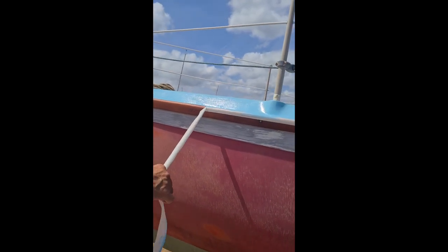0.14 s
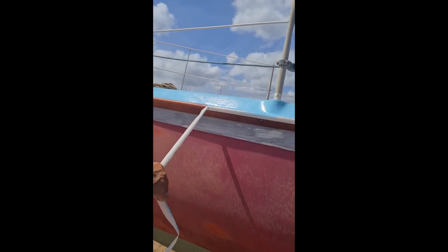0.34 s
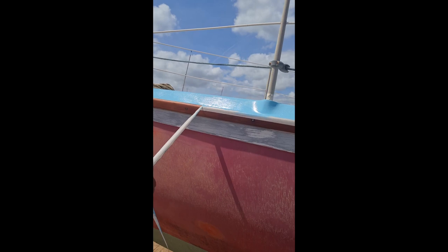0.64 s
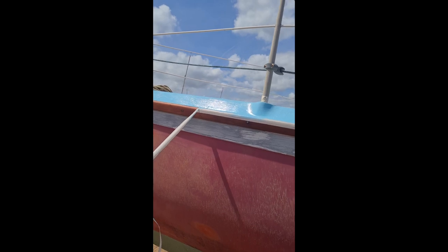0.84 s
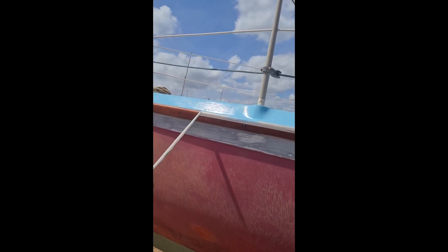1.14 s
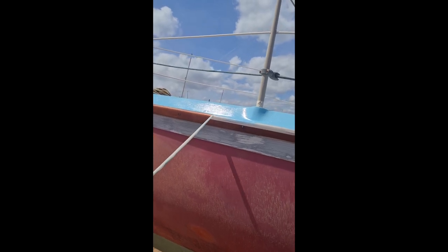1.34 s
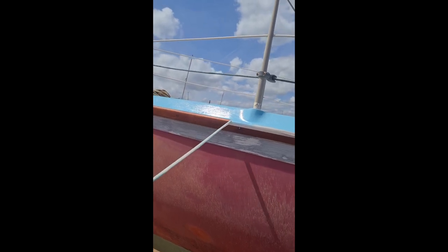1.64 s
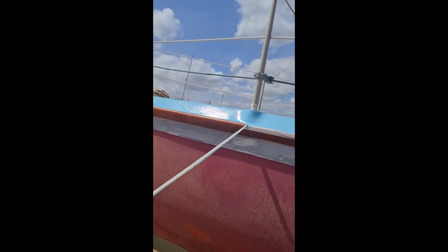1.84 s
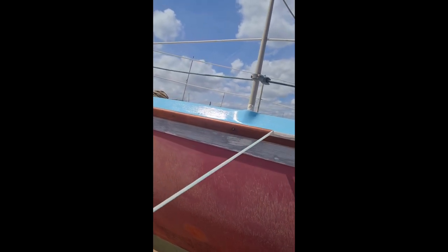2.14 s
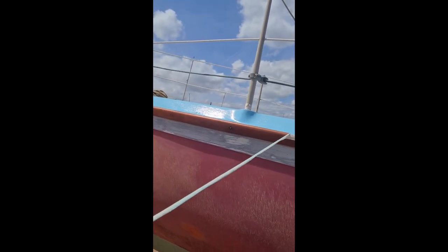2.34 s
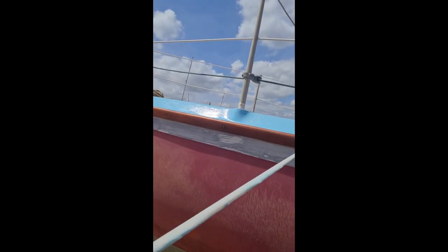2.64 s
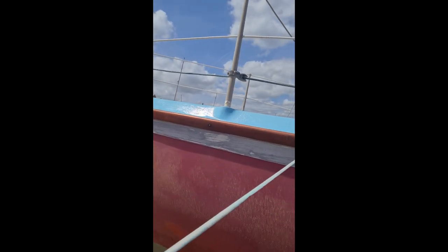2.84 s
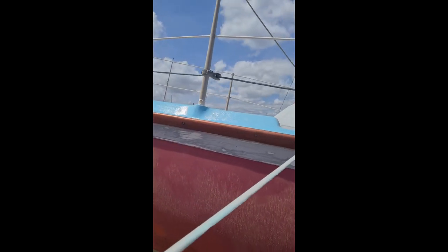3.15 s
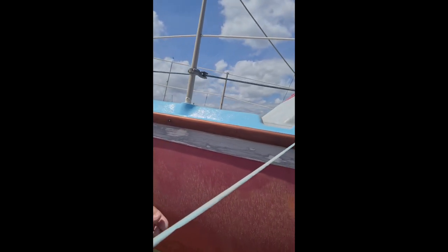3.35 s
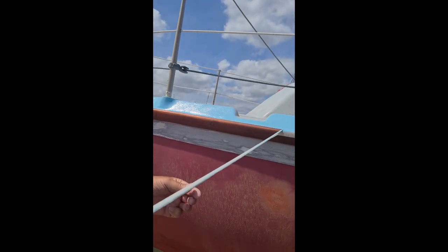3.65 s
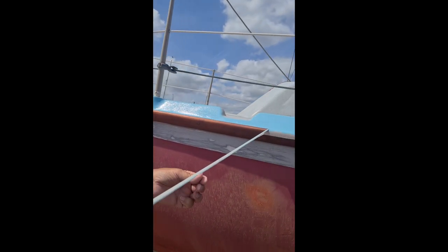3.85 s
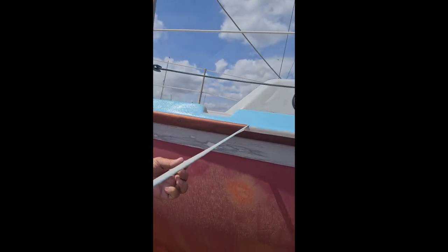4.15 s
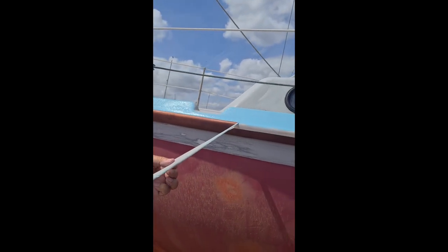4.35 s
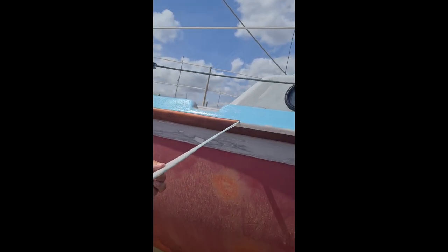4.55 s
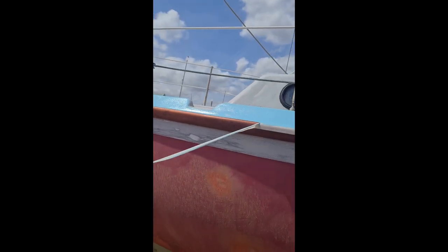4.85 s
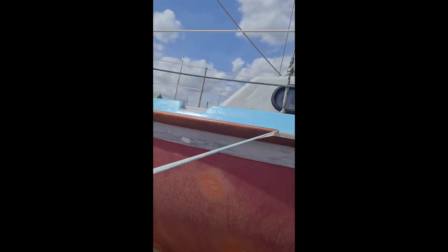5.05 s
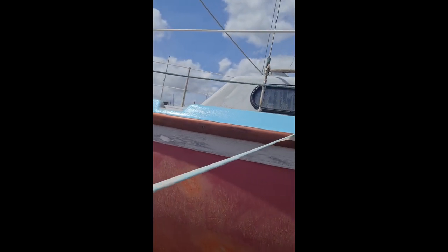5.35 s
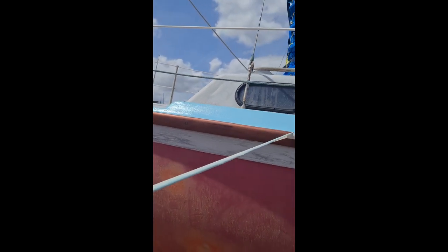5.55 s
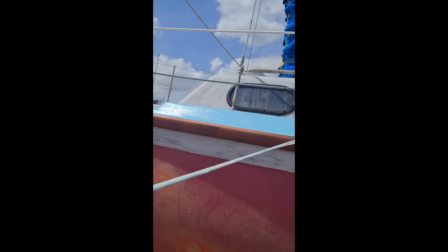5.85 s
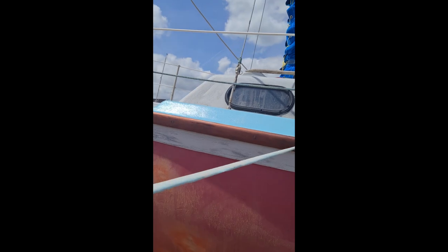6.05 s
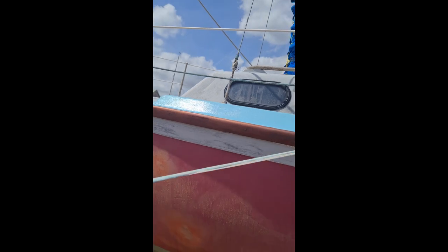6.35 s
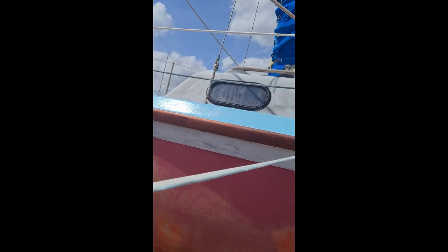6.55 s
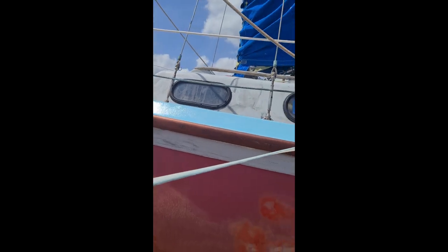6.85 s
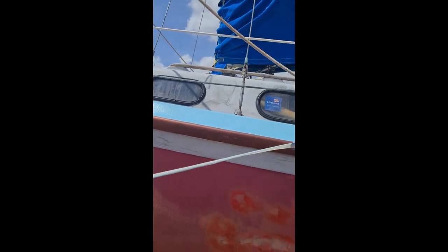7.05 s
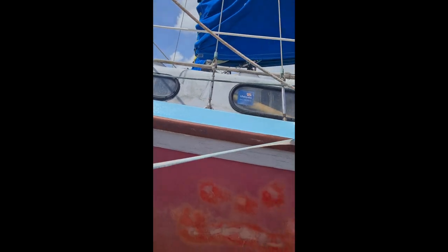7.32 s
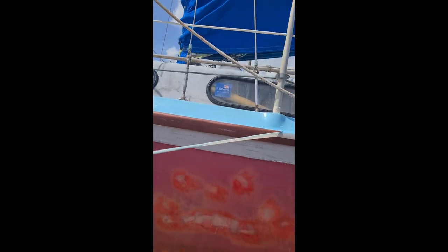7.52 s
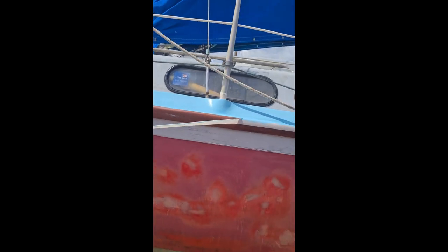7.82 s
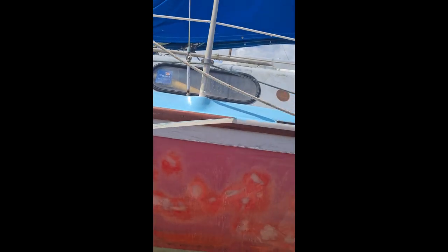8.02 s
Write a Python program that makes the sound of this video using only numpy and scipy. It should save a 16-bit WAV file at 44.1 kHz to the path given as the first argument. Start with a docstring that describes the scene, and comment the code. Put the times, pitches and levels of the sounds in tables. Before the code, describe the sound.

Close stereo phone pickup with separate wind buffets on each side. A big low thump comes just before one second, then tape tears away in fine bright snaps. The pull weakens, gritty shoe scuffs crunch mid-way, and the peel resumes stronger, catching and letting go several times a second. Later gusts flutter harder, and a faint metallic clink sounds near the end. Dry open air, no echo.

```python
"""Wind buffets two microphone ports separately while a shoe scuffs gritty ground and a metal fitting clinks.
Masking tape is then pulled off a painted hull in a breezy yard: the glue lets go in a spray of tiny snaps.
Wind is summed pressure bumps; tape and grit are random impulses through filters; the fitting is ringing modes.
The left port faces the tape; the right hears it dull, by a late direct path and stray ones around the phone."""
import sys
import numpy as np
from scipy import signal
from scipy.fft import rfft, irfft
from scipy.io import wavfile

SR = 44100
rng = np.random.default_rng(int(sys.argv[2]) if len(sys.argv) > 2 else 0)


def store_pcm(level_fs):
    """Save levels as 16-bit WAV."""
    pcm = np.round(np.clip(level_fs, -1, 1) * 32767).astype(np.int16)
    wavfile.write(sys.argv[1], SR, np.atleast_2d(pcm).T)


N = 360738   # length in samples

# The pull. Each row: time in seconds, snapping in dB before the near-port gain and the dips,
# drumming of the taut strip in dB relative to the snapping.
PULL_CURVE = [(0.0, -109, 3), (0.89, -78.5, -16), (1.05, -56.5, -18), (1.16, -49, -5.5), (1.87, -49, -6),
              (2.3, -49, -13.5), (2.62, -49, -4.5), (2.82, -58, -7), (3.1, -53.5, -22), (3.44, -77, 10.5),
              (3.6, -54, 0.5), (4.12, -74.5, -17), (4.24, -66.5, 10), (4.35, -75, 4), (4.55, -51.5, -5.5),
              (5.0, -43.5, -24), (5.35, -42.5, -11.5), (5.6, -49.5, -10.5), (5.92, -45, -14.5),
              (6.42, -45, -17), (6.75, -51.5, -13), (7.18, -43, -26), (7.6, -45, -17), (7.8, -42.5, -28),
              (8.18, -44.5, -17)]
# The tape catches and the pull falters. Each row: centre in seconds, dip in dB, half length in seconds.
PULL_STALLS = [(5.082, 4.5, 0.062), (5.258, 7.5, .08), (5.451, 18, 0.091), (5.673, 5.5, 0.06),
               (5.828, 14.5, 0.093), (6.02, 6, 0.039), (6.178, 12, 0.082), (6.312, 5, .07),
               (6.56, 7.5, .14), (6.766, 10, 0.043), (6.955, 6, 0.047), (7.121, 8.5, 0.054),
               (7.327, 6, 0.064), (7.5, 11, 0.094), (7.685, 19.5, 0.11), (7.887, 8.5, 0.075),
               (8.06, 8, 0.068)]
# Spectrum of the glue letting go. Each row: frequency in Hz, relative density in dB per Hz.
SNAP_SPECTRUM = [(2940, -21), (5000, -14.5), (6360, -9.5), (6820, -5), (7630, -4.5), (8100, -3.5),
                 (8420, -5), (9020, -17), (9480, -16), (11000, -11.5), (15000, -7), (15800, -13),
                 (16200, -42.5)]
# Spectrum of the drumming strip. Each row: frequency in Hz, relative density in dB per Hz.
STRIP_SPECTRUM = [(1500, -16.5), (2200, -15), (3000, 0), (4000, 3.5), (5200, 1), (6500, 2), (8500, -35)]
# Single loud snaps. Each row: start in seconds, peak of the high part in dB before the near-port gain,
# peak of the low part in dB relative to the high.
LOUD_SNAPS = [(0.078, -71, 19), (0.5805, -65, -10), (0.6135, -52, -5), (0.624, -44, -15),
              (0.856, -47.5, 2.5), (0.951, -53, -23), (1.0824, -39, -15), (1.1612, -34, -7),
              (1.263, -34, -16), (1.396, -30, -20), (1.5703, -45, -21), (1.8198, -37, -13),
              (1.854, -32.5, -23), (1.8955, -30, -32), (3.321, -66, 19), (3.5808, -43.5, 17),
              (4.067, -76, 9), (4.282, -51, -12), (4.3427, -56, 24.5), (5.7609, -43.5, 20), (5.758, -58, 6),
              (5.774, -38, 4), (5.8897, -46, -22), (6.0516, -38, -22), (6.4967, -44, 12), (6.722, -47, -14),
              (7.029, -30, -16), (7.171, -31.5, -31), (7.524, -48.5, 14), (7.7837, -40, -25)]
# Loss on the way to the right port. Each row: frequency in Hz, loss in dB.
BODY_SHADOW = [(300, -7.5), (700, 9), (1400, 15), (3000, 27), (4500, 25.5), (7500, 42), (8500, 37),
               (9500, 21), (12000, 13), (13500, 21), (15000, 22)]
# Shoes dragging on grit. Each row: start in seconds, held time in seconds, level in dB,
# sharpness in dB per octave.
SHOE_DRAGS = [(0.04, 0.036, -43, -15), (1.16, .38, -44.5, -1), (2.59, 0.052, -35.5, 2.5),
              (2.77, 0.055, -35, -6), (3.17, 0.085, -35.5, -1), (3.32, 0.026, -41, 3.5),
              (3.49, 0.051, -33.5, 1), (3.54, 0.24, -29.5, 1), (3.755, 0.02, -29, -0.5),
              (3.82, 0.15, -37.5, -0.5), (4.22, 0.038, -30.5, -6), (4.345, 0.0088, -37.5, 1.5),
              (4.44, .04, -43, 3.5), (4.5, 0.045, -29.5, 2), (4.6, 0.07, -37.5, 2.5),
              (4.669, 0.091, -29, 1.5), (4.78, 0.038, -34, 2), (5.14, 0.023, -36, 2.5),
              (5.33, 0.23, -35, -5), (5.51, 0.011, -38, 6), (5.76, 0.01, -42, 7), (6.16, .16, -40, 0),
              (6.21, .06, -35, 1), (6.42, .06, -38.5, -5), (6.495, 0.028, -20.5, 0), (6.58, .3, -39, -6.5),
              (7.0, 0.037, -31.5, -36), (7.28, 0.032, -40, 4.5), (7.47, 0.061, -34.5, -9.5),
              (7.6, 0.097, -43.5, -1), (8.0, 0.035, -40, -8), (8.05, .06, -25, -21)]
# Grit shifting between the drags. Each row: time in seconds, level in dB.
GRIT_SHUFFLE = [(1.0, -83), (1.2, -59), (2.5, -46), (3.0, -54), (4.2, -55.5), (5.0, -44.5), (5.9, -52),
                (6.9, -49), (7.2, -57), (8.18, -72)]
# Resonances of sole and grit. Each row: frequency in Hz, width in Hz before a common 40 Hz is added,
# relative level in dB before sharpness and drift.
GRIT_MODES = [(690, 100, -2.5), (1063, 115, 4), (1370, 217, 0.5), (1940, 280, -2.5), (2196, 27, -1.5),
              (2450, 460, -6), (3230, 340, -13), (3695, 9.1, -5.5)]
# Knocks on the metal fitting. Each row: time in seconds, strength in dB.
FITTING_KNOCKS = [(0.199, -64), (6.747, -38)]
# Modes of the fitting. Each row: frequency in Hz, relative level in dB, 60 dB decay time in seconds.
FITTING_MODES = [(2050, -15, .1), (3420, -4.5, 0.23), (3350, -19, 0.23), (4030, -7.5, 0.19),
                 (6300, -2, 0.12)]
# Eddy sizes. Each row: top frequency in Hz, eddies per second, relative level in dB,
# share of the small-eddy control followed.
EDDY_SIZES = [(77.9, 300, -1, 0.019), (163, 300, -6.5, 0.22), (275, 380, -4, 0.64), (415, 250, -8.5, 1.08),
              (702, 280, -15.5, 2.1), (1140, 700, -26.5, 3.5), (2210, 490, -50, 3)]
# Wind on the left port. Each row: time in seconds, big-eddy control in dB, small-eddy control in dB
# relative to it.
LEFT_GUSTS = [(0.0, -32, -61), (0.15, -30, -15), (0.32, -26, -16), (0.47, -44, -20), (0.65, -31, -5),
              (0.87, -16.5, -14), (1.02, -24, -22), (1.1, -26.5, -45), (1.4, -33, -22), (1.7, -28, -39),
              (2.15, -41.5, -38), (2.7, -35, -25), (2.85, -33.5, -22), (3.15, -35, -31), (3.3, -63, -13),
              (3.95, -47, -27), (4.08, -31, -39), (4.2, -71, -14), (4.5, -31.5, -46), (4.85, -26.5, -21),
              (5.2, -32.5, -24.5), (5.5, -29, -15.5), (5.7, -30.5, -1.5), (5.9, -32, -1.5),
              (6.0, -23.5, -16.5), (6.28, -25.5, -16), (6.5, -30.5, 2), (6.9, -30.5, -1.5),
              (7.15, -22.5, -15.5), (7.35, -34, -12.5), (7.5, -34, -0.5), (8.05, -26, -18),
              (8.18, -33, -12)]
# Wind on the right port. Each row: time in seconds, big-eddy control in dB, small-eddy control in dB
# relative to it.
RIGHT_GUSTS = [(0.0, -50, -22), (0.55, -44.5, -22), (0.78, -32.5, -24), (0.92, -40, -23.5),
               (1.42, -44, -30), (1.62, -33, -10), (1.82, -42.5, -24), (2.0, -26, -13), (2.9, -30, -15),
               (3.18, -51, -18), (3.55, -54, -13), (4.2, -62, -15), (4.55, -41, -33), (4.95, -31, -14.5),
               (5.17, -30, -12.5), (5.3, -43, -34), (5.48, -25, -12.5), (5.78, -27.5, -2), (5.9, -46, -36),
               (6.17, -39, -28), (6.3, -24, -3.5), (6.55, -32.5, 0), (6.9, -31, 0), (7.15, -32, -8.5),
               (7.48, -23, -4.5), (7.65, -32.5, 3.5), (7.95, -28, -8), (8.18, -28, 0)]
# Strongest single eddies. Each row: centre in seconds, peak in dB, pitch in Hz, port (0 left, 1 right).
SINGLE_EDDIES = [(0.303, -10.5, 79.5, 0), (0.743, -16, 264, 0), (0.847, -17, 243, 0), (0.89, -3.5, 72, 0),
                 (0.903, -10.5, 250, 0), (0.991, -13, 201, 0), (1.719, -13.5, 69, 0), (4.069, -30, 69.5, 0),
                 (5.709, -17, 430, 0), (5.742, -16, 380, 0), (5.842, -15.5, 298, 0), (5.892, -12, 282, 0),
                 (6.01, -6, 78.4, 0), (6.338, -18, 75.0, 1), (6.42, -14, 242, 1), (6.441, -18.0, 220.0, 1),
                 (6.499, -15.5, 530.0, 0), (6.523, -13, 320.0, 0), (6.529, -14, 296, 1),
                 (6.542, -12, 310.0, 1), (6.633, -17, 378, 0), (6.685, -14.5, 280, 1),
                 (6.797, -16, 270.0, 0), (6.832, -16, 330, 1), (6.853, -16, 290.0, 0),
                 (6.887, -17, 280.0, 1), (7.379, -17.5, 270.0, 1), (7.479, -14.5, 315, 1),
                 (7.502, -15, 252, 1)]
# Far yard noise. Each row: frequency in Hz, left density in dB per Hz, right density in dB per Hz.
YARD_SPECTRA = [(29, -94, -68), (63.5, -60.5, -66), (105, -86, -83), (285, -88, -93.5), (547, -88.5, -100),
                (930, -94.5, -108), (1780, -104, -118), (4300, -109, -126), (5700, -116, -130),
                (7400, -103, -136), (7970, -107, -134), (8800, -130, -131), (12500, -123, -122),
                (15500, -127, -125)]

NEAR_PORT_DB = 2   # gain of tape sounds, as the left port faces the tape
DRUM_KEEPS = 0.31   # share of each dip that the still taut strip does not follow
LATE_SAMPLES = 19   # longer direct way to the right port
SCATTER = 0.75   # share of the right port's power that comes by stray paths
SCUFF_RISE_DB_PER_S, SCUFF_FALL_DB_PER_S = 380, 380
SHUFFLE_SHARPNESS_DB = 6   # per octave
PORT_CUT_HZ, CUTOFF_HZ = 74.4, 15800   # wind pressure leak, recording top


def from_db(db):
    """The decibel law: level to amplitude gain."""
    return 10 ** (np.asarray(db) / 20)


def rms_one(x):
    """Normalisation by power: scale to rms 1."""
    return x / np.sqrt(np.mean(x ** 2) + 1e-20)


def in_time(rows):
    """Linear interpolation: columns of a curve table, one value a sample."""
    seconds, *columns = np.transpose(rows)
    t = np.arange(N) / SR
    return [np.interp(t, seconds, column) for column in columns]


def response(points, column=1):
    """Frequency response: a table in Hz and dB as gain on the FFT grid, linear in log frequency."""
    hz = np.maximum(np.fft.rfftfreq(N, 1 / SR), 1)
    table = np.array(points)
    return from_db(np.interp(np.log(hz), np.log(table[:, 0]), table[:, column]))


def colour(x, gain):
    """Linear filtering as a product of spectra on the FFT grid."""
    return irfft(rfft(x) * gain, N)


def drift(rate_hz):
    """Low-passed noise: a slow random course with rms 1."""
    r = np.exp(-40 * np.pi * rate_hz / SR)   # computed at a twentieth of SR
    noise = rng.standard_normal(N // 20 + 2002)
    slow = signal.lfilter([1], [1, -2 * r, r * r], noise)[2000:]   # start-up discarded
    return np.interp(np.arange(N) / 20, np.arange(len(slow)), rms_one(slow))


def grains(per_s, spread_db, upward=.5):
    """Shot noise: random impulses of uneven size; upward is the share that pushes rather than pulls."""
    sizes = from_db(spread_db * np.minimum(rng.exponential(1, N), 5))
    signs = np.where(rng.random(N) < upward, 1., -1.)
    happens = rng.random(N) < per_s / SR
    return sizes * signs * happens + 1e-18


def band(x, low_hz, high_hz, order=2):
    """Butterworth band-pass: maximally flat between two edges."""
    sos = signal.butter(order, [low_hz, high_hz], "band", fs=SR, output="sos")
    return signal.sosfilt(sos, x)


def peel():
    """Stick-slip fracture: glue threads snap densely; coarser jerks also drum on the stretched strip."""
    snap_db, strip_db = in_time(PULL_CURVE)
    dip_db = stalls()
    jerks = grains(200, spread_db=2.7, upward=1)
    jerk_envelope = signal.lfilter([1], [1, -np.exp(-1 / (0.0017 * SR))], jerks)   # 1.7 ms decay
    jerks = rms_one(jerk_envelope * rng.standard_normal(N))
    threads = rms_one(grains(6000, spread_db=0.0) * from_db(1.16 * drift(30)))
    snapping = rms_one(colour(threads + .5 * jerks, response(SNAP_SPECTRUM)))
    drumming = rms_one(colour(threads + 1.1 * jerks, response(STRIP_SPECTRUM)))
    drumming = drumming * from_db(strip_db + DRUM_KEEPS * dip_db)
    twisting = patchy(snapping + drumming, depth_db=2.0)
    return from_db(snap_db - dip_db + NEAR_PORT_DB) * twisting


def stalls():
    """Slackening tension: the pull dips in dB toward each catch and picks up again after it."""
    t = np.arange(N) / SR
    return sum(dip_db * np.maximum(1 - abs(t - s) / half_s, 0) for s, dip_db, half_s in PULL_STALLS)


def patchy(x, depth_db):
    """Varying radiation: the strip twists as it comes away, so each band swells and sinks by itself."""
    edges_hz = np.geomspace(2000, 16000, 19)
    out = x
    for low_hz, high_hz in zip(edges_hz, edges_hz[1:]):
        change = from_db(depth_db * drift(7.6)) - 1
        out = out + band(x, low_hz, high_hz, order=1) * change
    return out


def ticks():
    """Sudden release at a stubborn spot: a sharp crack with a ragged tail of a few milliseconds."""
    out, age = np.zeros(N), np.arange(700) / SR
    for s, peak_db, low_db in LOUD_SNAPS:
        burst = .4 * rng.standard_normal(700) * np.exp(-age / .002)
        burst[0] = 1
        high = band(burst, 3500, 8600)
        low = band(burst, 1000, 4000, order=1)
        crack = high / abs(high).max() + from_db(low_db) * low / abs(low).max()
        at = round(s * SR)
        out[at:at + 700] += from_db(peak_db) * crack
    return from_db(NEAR_PORT_DB) * out


def scuff():
    """Granular friction: grit cracks under the sole in uneven bursts; sharp drags favour outer resonances."""
    level, sharpness_db = drags()
    grit = rms_one(grains(2500, spread_db=0.0) * from_db(4.3 * np.tanh(drift(19) / 1.24)))
    out = from_db(-16.5 + 1.7 * sharpness_db) * band(grit, 1700, 5900, order=1)   # dry rasp
    for k, (hz, width_hz, mode_db) in enumerate(GRIT_MODES):
        r = np.exp(-np.pi * (width_hz + 40) / SR)
        poles = [1, -2 * r * np.cos(2 * np.pi * hz / SR), r * r]
        ring = signal.lfilter([1, 0, -1], poles, grit) * (1 - r * r) / 2
        octaves = abs(np.log2(hz / 1150))   # distance to either side of 1150 Hz
        gain_db = mode_db + sharpness_db * octaves + 2.03 * drift(26)
        out = out + ring * from_db(gain_db) * (-1) ** k   # alternating polarity
    return level * out


def drags():
    """Addition of powers: drags rise, hold and die over the shuffle; the loudest sets the sharpness."""
    t = np.arange(N) / SR
    power = from_db(2 * in_time(GRIT_SHUFFLE)[0])   # twice the dB turns gain into power
    weighted = power * SHUFFLE_SHARPNESS_DB
    for s, held_s, level_db, sharpness_db in SHOE_DRAGS:
        before_db = SCUFF_RISE_DB_PER_S * np.maximum(s - t, 0)
        after_db = SCUFF_FALL_DB_PER_S * np.maximum(t - s - held_s, 0)
        drag = from_db(2 * (level_db - before_db - after_db))
        power = power + drag
        weighted = weighted + drag * sharpness_db
    return np.sqrt(power), weighted / power


def clinks():
    """Modal vibration: each knock sets the damped modes of the fitting ringing."""
    knocks, out = np.full(N, 1e-18), 0
    for s, strength_db in FITTING_KNOCKS:
        knocks[round(s * SR)] = from_db(strength_db)
    for hz, level_db, t60_s in FITTING_MODES:
        r, w = from_db(-60 / (t60_s * SR)), 2 * np.pi * hz / SR
        ring = signal.lfilter([0, np.sin(w)], [1, -2 * r * np.cos(w), r * r], knocks)
        out = out + from_db(level_db) * ring
    return out


def shaded(x):
    """Diffraction and scattering: a late direct path plus stray paths that shift, dulled by the phone's body."""
    direct = np.pad(x, (LATE_SAMPLES, 0))[:N]
    paths = rng.standard_normal((2, 2000)) * np.exp(-np.arange(2000) / (0.017 * SR))
    first, second = (signal.fftconvolve(x, path / np.linalg.norm(path))[:N] for path in paths)
    sway = 2.5 * drift(12)   # radians; the phone sways
    stray = np.cos(sway) * first + np.sin(sway) * second
    heard = np.sqrt(1 - SCATTER) * direct + np.sqrt(SCATTER) * stray
    heard[-300:] *= np.linspace(1, 0, 300)   # nothing wraps round to the start
    return colour(heard, 1 / response(BODY_SHADOW))


def wind(big_db, small_db):
    """Turbulent pressure: eddies pass as smooth bumps; a faster gust brings out smaller, sharper ones."""
    out, hz = 0, np.fft.rfftfreq(N, 1 / SR)
    flutter = 1.68 * np.tanh(drift(16.6) / 0.98)
    port = hz ** 2 / np.hypot(hz ** 2, PORT_CUT_HZ ** 2)   # the slowest pressure leaks away
    fronts = rms_one(grains(140, spread_db=2.0, upward=.75))   # one front carries eddies of several sizes
    for top_hz, per_s, level_db, share in EDDY_SIZES:
        bell = np.exp(-(hz / top_hz) ** 2.39) * hz / np.hypot(hz, 1.14 * top_hz)
        passing = rms_one(grains(per_s, spread_db=3.0, upward=.7)) + 0.57 * share * fronts
        gain_db = big_db + level_db + share * small_db + (3.65 + 0.7 * share) * flutter
        out = out + rms_one(colour(passing, bell * port)) * from_db(gain_db)
    return out


def pops():
    """Local pressure pulse: a strong eddy hits one port as a single bump with a dip on either side."""
    out, age = np.zeros((2, N)), np.arange(-900, 900) / SR
    for s, peak_db, hz, port in SINGLE_EDDIES:
        turn = (np.pi * hz * age) ** 2
        bump = (1 - 2 * turn) * np.exp(-turn)
        at = round(s * SR)
        out[int(port), at - 900:at + 900] += from_db(peak_db) * bump
    return out


def yard():
    """Partial coherence: steady far noise, partly alike at both ports."""
    left, stray = rng.standard_normal((2, N)) * np.sqrt(SR / 2)   # unit power per Hz
    right = .6 * left + .8 * stray
    left_noise = colour(left, response(YARD_SPECTRA, column=1))
    right_noise = colour(right, response(YARD_SPECTRA, column=2))
    return np.array([left_noise, right_noise])


def scene():
    """Superposition: near sounds reach both ports, each with wind of its own."""
    near, clink = peel() + ticks() + scuff(), clinks()
    left = near + clink + wind(*in_time(LEFT_GUSTS))
    right = shaded(near + from_db(5) * clink) + wind(*in_time(RIGHT_GUSTS))
    return np.array([left, right]) + pops() + yard()


def record(dry):
    """Saturation and band limit: the microphone stage rounds strong buffets; the top is cut steeply."""
    rounded = .7 * np.tanh(dry / .7)
    steep_cut = signal.ellip(14, .5, 90, CUTOFF_HZ, fs=SR, output="sos")
    return signal.sosfilt(steep_cut, rounded)


dry = scene()
out = record(dry)
store_pcm(out)
```